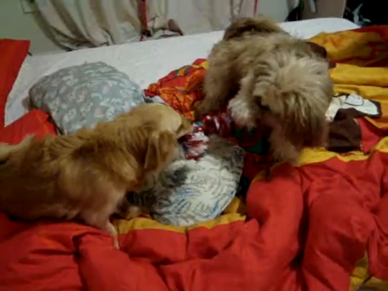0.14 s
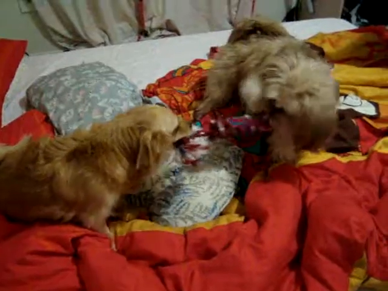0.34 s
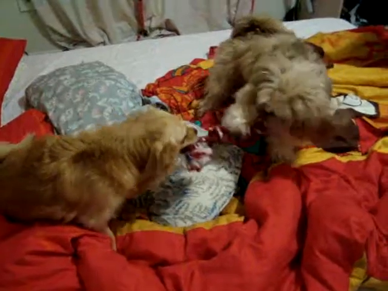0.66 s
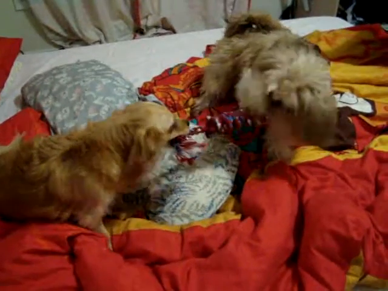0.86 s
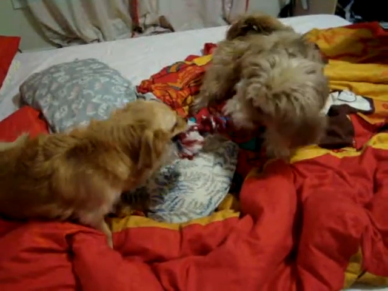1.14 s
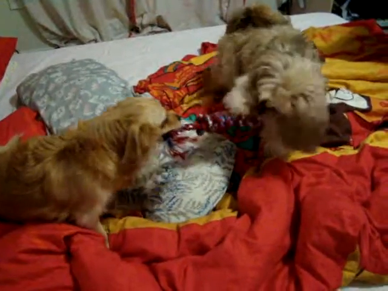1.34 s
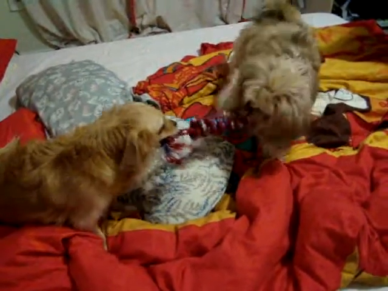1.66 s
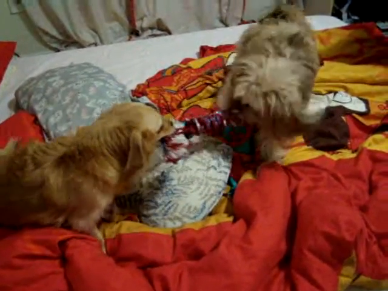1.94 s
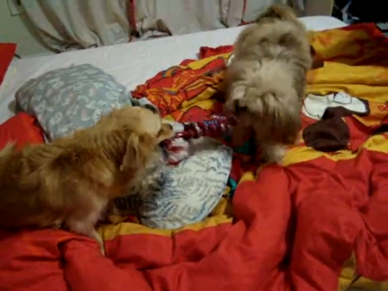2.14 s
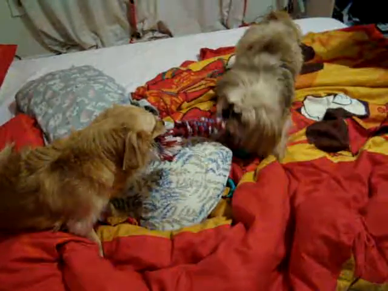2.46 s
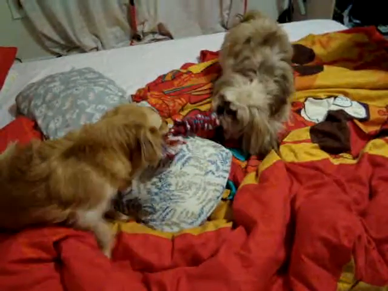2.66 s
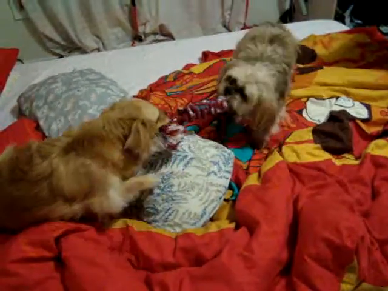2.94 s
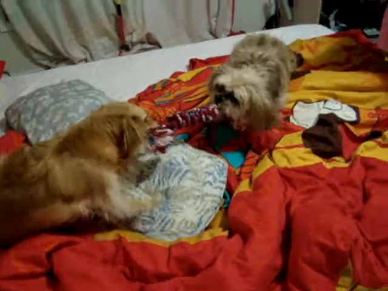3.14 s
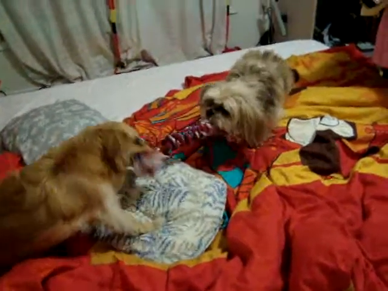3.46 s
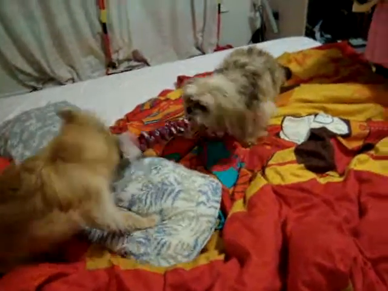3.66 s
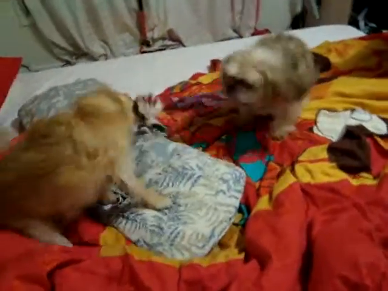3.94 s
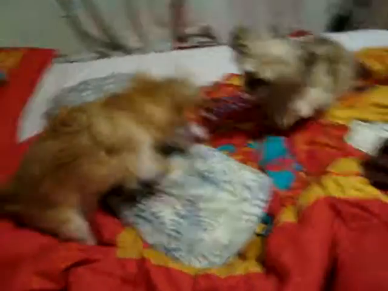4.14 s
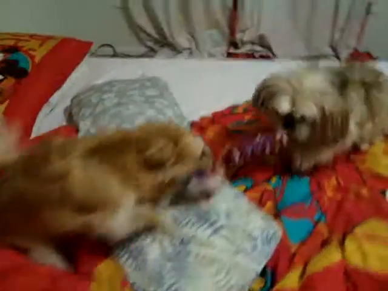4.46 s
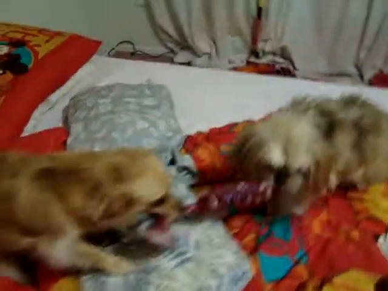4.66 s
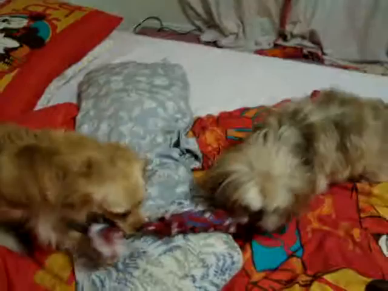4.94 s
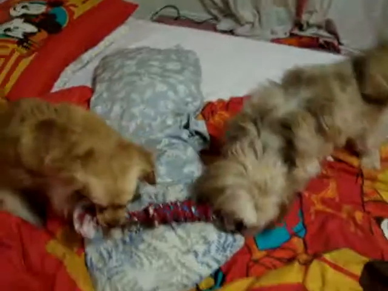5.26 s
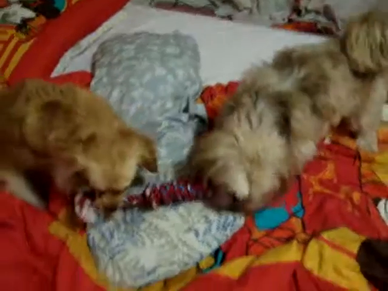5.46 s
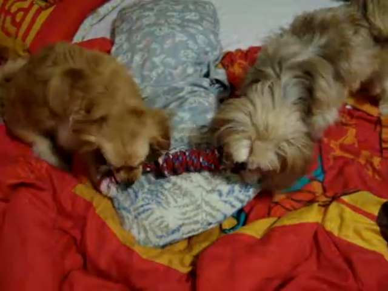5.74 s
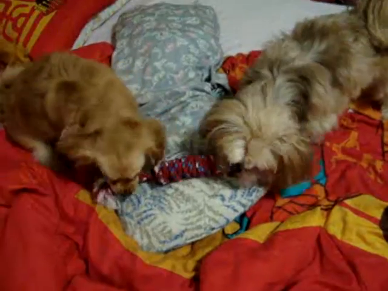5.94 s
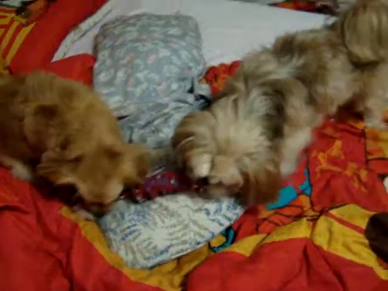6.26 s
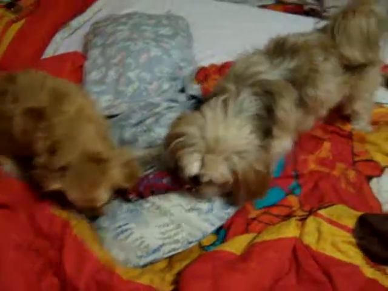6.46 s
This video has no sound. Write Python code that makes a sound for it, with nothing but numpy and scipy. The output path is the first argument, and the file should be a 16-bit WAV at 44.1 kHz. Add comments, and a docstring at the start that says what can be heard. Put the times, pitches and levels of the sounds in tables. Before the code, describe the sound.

Close, mono sound of small dogs play-growling indoors. Quiet gravelly bursts with gaps lead to rapid clipped growls, then longer rough snarls that shudder and snap, many ending in a wet nasal snort. A few tiny bright scrapes of teeth or claws join in. The end fades to low grunts and a faint nose whistle, over constant soft room hum and a short room echo.

```python
"""Tug-of-war on the bed

Two small dogs, close to the microphone, tug at a rope toy on a bed and growl in quick strings of short growls.
Slack vocal folds flap unevenly into chest, throat and muzzle; many growls end in a snort through the nose.
Single slaps of the folds, scrapes of teeth and claws on toy and bedding, and a faint nose whistle join in.
A small bedroom answers over its steady hum."""
import sys
import numpy as np
from scipy import signal
from scipy.fft import rfft, irfft, next_fast_len
from scipy.io import wavfile
from scipy.ndimage import uniform_filter1d, map_coordinates

SR = 44100
rng = np.random.default_rng(int(sys.argv[2]) if len(sys.argv) > 2 else 0)


def output_pcm(signal):
    """Save a mono or channel-first signal as 16-bit PCM at the path in sys.argv[1].

    Samples are clipped to [-1, 1] before scaling.
    """
    pcm = np.clip(np.atleast_2d(signal).T, -1, 1) * 32767
    wavfile.write(sys.argv[1], SR, np.round(pcm).astype(np.int16))


N = 290619  # samples


def amp(db):
    """Decibels to gain."""
    return 10 ** (np.asarray(db) / 20)


def unit(x):
    """Scale to rms 1."""
    return x / np.sqrt(np.mean(x ** 2) + 1e-20)


def along(points, hz):
    """(Hz, value) points read on a log frequency axis."""
    f, v = np.transpose(points)
    return np.interp(np.log(hz + 1), np.log(f + 1), v)


def filtered(x, response):
    """x times a complex response of frequency."""
    m = next_fast_len(len(x) + 4096)
    hz = np.fft.rfftfreq(m, 1 / SR)
    return irfft(rfft(x, m) * response(hz), m)[:len(x)]


def resonate(x, modes, low_hz):
    """x through (Hz, width Hz, dB) resonances that radiate little below low_hz."""
    def body(f):
        return sum(amp(db) * 1j * f * w / (c * c - f * f + 1j * f * w) for c, w, db in modes)

    def radiation(f):
        return -f * f / (low_hz ** 2 - f * f + 1j * np.sqrt(2) * f * low_hz)

    return filtered(x, lambda f: body(f) * radiation(f))


def muffle(x, edge_hz, order=2):
    """A causal low-pass."""
    return signal.sosfilt(signal.butter(order, min(edge_hz, SR / 3), fs=SR, output="sos"), x)


def steady(x, seconds):
    """Hold the rms near 1 over stretches of the given length."""
    x = unit(x)
    power = uniform_filter1d(x * x, max(int(seconds * SR), 2))
    return x / np.sqrt(np.abs(power) + 0.037)  # the floor keeps pauses from being blown up


def add(track, s, x):
    """Mix x into the track from time s."""
    start = max(round(s * SR), 0)
    track[start:start + len(x)] += x[:max(len(track) - start, 0)]


def wobble(n, rate):
    """A smooth random curve, rate knots a second."""
    knots = rng.standard_normal(int(n * rate / SR) + 4)
    return map_coordinates(knots, [np.arange(n) * rate / SR])


def blend(a, b, share):
    """Two unrelated sounds mixed by power; share is that of b."""
    share = np.clip(share, 0, 1)
    return np.sqrt(1 - share) * unit(a) + np.sqrt(share) * unit(b)


# Steady spectrum of the room at the microphone. Each row: frequency in Hz, relative density in dB per Hz.
HUM_SPECTRUM = [(12, -58), (20, -29), (144, -8.5), (173, -11.5), (213, 2.5), (291, 3), (687, -5.5),
                (868, -2), (1010, -6.5), (1350, -9), (1500, -10), (1990, -13), (3100, -15), (4830, -17),
                (10000, -22.5), (13000, -91), (22000, -120)]


def hum():
    """The steady background of the room: noise shaped to a fixed spectrum."""
    noise = rng.standard_normal(N)
    return amp(-48.0) * unit(filtered(noise, lambda hz: amp(along(HUM_SPECTRUM, hz))))


def flaps(n, rate, jitter, scatter_db):
    """Fold closures at uneven intervals and of uneven strength."""
    gap, size = rng.standard_normal((128, 2)).T
    gaps = np.exp(jitter * gap) / rate
    at = ((np.cumsum(gaps) - gaps[0] + 0.001977) * SR).astype(int)
    inside = at < n
    return np.bincount(at[inside], amp(scatter_db * size[inside]), n)


def fold_tone(n, hz):
    """The low hum of the folds when they swing almost evenly."""
    phase = 2 * np.pi * np.cumsum(hz * (1 + 0.048 * wobble(n, rate=41.8))) / SR
    return unit(np.sin(phase) + amp(-8.5) * np.sin(2 * phase))


def scatter(x, echo_db, fall):
    """Sound leaving the lowered head also bounces off the toy, the other dog and the bed."""
    t = np.arange(SR // 20) / SR
    paths = rng.standard_normal(len(t)) * np.exp(-t / fall) * (t > .0015)
    echoes = signal.fftconvolve(x, paths / np.linalg.norm(paths))[:len(x)]
    return x + amp(echo_db) * echoes


def airway(x, modes, low_hz, shift, echo_db, fall):
    """The jaw works on the toy, so resonances and near echoes drift between a lower and a higher place."""
    jaw = np.pi / 4 * (1 + np.tanh(3.8 * wobble(len(x), rate=30.65)))
    total = 0
    for side, share in [(-0.6, np.cos(jaw)), (0.7, np.sin(jaw))]:
        moved = [(hz * np.exp(side * shift), w, db) for hz, w, db in modes]
        total = total + scatter(resonate(x * share, moved, low_hz), echo_db, fall)
    return total


def slap():
    """The folds shut sharply and crack through the whole airway; peak 1."""
    stretch = np.exp(0.051 * rng.standard_normal())
    modes = [(830 * stretch, 150, 0), (1300 * stretch, 350, -8),
             (2100 * stretch, 400, -13), (3000 * stretch, 900, -20)]
    ring = muffle(resonate(signal.unit_impulse(2048), modes, low_hz=255), edge_hz=2160, order=6)
    ring = scatter(ring, echo_db=6.5, fall=0.003)
    return ring / np.abs(ring).max()


# Resonances of the chest. Each row: centre in Hz, width in Hz, gain in dB before radiation.
CHEST_MODES = [(139, 39, -9), (191, 54, 3), (275, 72, 5), (338, 17, 1)]
CLEAN_AT_0_DB, CLEAN_GROWS = 1.95, 1.5  # the stronger the chest, the more evenly the folds swing
FALL_OCTAVES, FALL_S = 0.22, 0.092  # the fold tone sinks around the end of a growl


def chest_voice(pulses, t, length, rate, chest_db, tension):
    """Flaps ring the chest; tense folds add an even, sinking tone."""
    rumble = muffle(resonate(pulses, CHEST_MODES, low_hz=134), edge_hz=343, order=4)
    pitch = rate * 2 ** (-FALL_OCTAVES * np.clip((t - length) / FALL_S + .5, 0, 1))
    clean = CLEAN_AT_0_DB * amp(2 * CLEAN_GROWS * chest_db) * tension
    return blend(steady(rumble, seconds=.035), fold_tone(len(t), pitch), clean)


# Upper throat resonances. Each row: centre in Hz before the jaw moves it, width in Hz, gain in dB before radiation.
PHARYNX_MODES = [(587, 71, -20), (1128, 200, -16), (1310, 165, -8)]
THROAT_WIDTH_HZ, WIDTH_LOSS_HZ = 257, 157  # the throat resonance sharpens with effort


def throat_voice(pulses, puffs, air, effort, throat_hz):
    """Flaps and turbulent puffs ring the throat."""
    width = max(THROAT_WIDTH_HZ - WIDTH_LOSS_HZ * effort.mean(), 20)
    modes = [(throat_hz, width, 0)] + PHARYNX_MODES
    throat = airway(blend(pulses, puffs, air * 0.56), modes, low_hz=550, shift=0.028, echo_db=0, fall=0.016)
    return steady(muffle(throat, edge_hz=1220, order=4), seconds=0.028)


# Muzzle resonances. Each row: centre in Hz before the jaw moves it, width in Hz, gain in dB before radiation.
MUZZLE_MODES = [(2155, 170, 12), (2670, 520, 1), (3920, 980, -1.5)]
LIP_WIDTH_HZ, LIP_DB = 520, 2.5  # the mouth's front resonance, gain on the same scale


def muzzle_voice(pulses, puffs, alternation, air, lip_hz):
    """Flaps and turbulent puffs ring the muzzle and lips."""
    source = alternation * blend(pulses, puffs, 0.34 + air * 0.68)
    modes = MUZZLE_MODES + [(lip_hz, LIP_WIDTH_HZ, LIP_DB)]
    muzzle = airway(source, modes, low_hz=1850, shift=0.053, echo_db=-4.5, fall=0.0038)
    return steady(muffle(muzzle, edge_hz=3300 + 0.2 * lip_hz, order=10), seconds=0.077)


# Resonances of air hissing at the lips. Each row: centre in Hz, width in Hz, gain in dB before radiation.
LIP_HISS_MODES = [(5300, 2400, 0.17), (7660, 2500, -1.2)]


def lip_hiss(puffs, alternation):
    """Turbulent puffs hiss at the lips."""
    return unit(resonate(alternation * puffs, LIP_HISS_MODES, low_hz=4430))


CRACK_SCATTER_DB = 22.5  # greatest rise or fall of single ticks


def crack(pulses):
    """The dry tick of each fold closure, of widely varying strength."""
    strength = amp(CRACK_SCATTER_DB * np.tanh(wobble(len(pulses), rate=310)))
    ticks = resonate(pulses * strength, [(1400, 2600, -2.5), (4430, 760, 0.5)], low_hz=500)
    return muffle(unit(ticks), edge_hz=4100)


SHUDDER_HZ, SHUDDER_DB = 24.4, 6  # mean rate, full swing to either side
SHUDDER_FROM_DB, SHUDDER_FULL_DB = -26, -22  # growl levels between which it sets in


def shudder(n, level_db):
    """In a hard growl the loose lips and palate shudder almost evenly; the swing in dB."""
    depth_db = np.interp(level_db, [SHUDDER_FROM_DB, SHUDDER_FULL_DB], [0, SHUDDER_DB])
    rate = SHUDDER_HZ + 0.28 * wobble(n, rate=20)
    return depth_db * np.sin(2 * np.pi * np.cumsum(rate) / SR)


RELEASE_S = .016  # the push of air dies away
QUIET_DB, HARD_DB = -36, -22  # push at no effort and at full effort
SLACK_RATE, TENSE_RATE = 83, 350  # flaps per s
AIR_SLACK, AIR_TENSE = 0.14, 0.31  # turbulent air of slack and of tense folds, scaled for throat and muzzle
ALTERNATE_DB = -6  # at full effort every second flap reaches the muzzle weaker
HISS_DB, HISS_SHUDDER = -13, 0.6  # under the muzzle; share of the muzzle's shudder in dB
CRACK_DB = -15  # under the muzzle, at full tension


def growl(length, attack, level_db, swell_db, chest_db, muzzle_db, rate, throat_hz, lip_hz):
    """One growl: each flap rings the airway and lets a puff of turbulent air through."""
    t = np.arange(0, length + .1, 1 / SR)
    n = len(t)
    push_db = level_db + swell_db * (np.minimum(t / length, 1) - .5)
    release = np.exp(-np.maximum(t - length, 0) / RELEASE_S)
    envelope = amp(push_db) * np.minimum(t / attack, 1) * release
    effort = np.clip((push_db - QUIET_DB) / (HARD_DB - QUIET_DB), 0, 1)
    tension = np.interp(rate, [SLACK_RATE, TENSE_RATE], [0, 1])
    air = AIR_SLACK + tension * (AIR_TENSE - AIR_SLACK)

    pulses = flaps(n, rate, jitter=.4, scatter_db=2.5)
    puff_shape = signal.lfilter([1], [1, -np.exp(-1 / (.004 * SR))], pulses)  # each puff fades in 4 ms
    puffs = puff_shape * rng.standard_normal(n)
    alternation = amp(ALTERNATE_DB * effort * (np.cumsum(pulses > 0) % 2))

    chest = chest_voice(pulses, t, length, rate, chest_db, tension)
    throat = throat_voice(pulses, puffs, air, effort, throat_hz)
    muzzle = muzzle_voice(pulses, puffs, alternation, air, lip_hz)
    hiss = lip_hiss(puffs, alternation)
    ticks = tension * amp(CRACK_DB) * crack(pulses)

    shudder_db = shudder(n, level_db)
    mouth = amp(shudder_db) * (muzzle + ticks) + amp(HISS_DB + HISS_SHUDDER * shudder_db) * hiss
    voice = amp(0.1 * shudder_db) * throat + amp(chest_db) * chest + amp(muzzle_db) * mouth
    return envelope * voice


# Growls of both dogs, close to the microphone. Each row: start in seconds, length in seconds,
# attack in seconds, level in dB, swell from start to end in dB, chest over throat in dB,
# muzzle over throat in dB, flaps per second before jitter, throat resonance in Hz and lip
# resonance in Hz, both before the jaw moves them.
GROWL_EVENTS = [ (0.0, 0.097, .004, -42.5, -13.5, -18, -7, 103, 630, 3580),
                (0.321, 0.19, .004, -38.5, 3, -15.5, -11.5, 100.5, 734, 3280),
                (0.734, 0.11, .004, -42.5, -5.5, -14, -18, 84, 710, 3780),
                (1.052, 0.21, .004, -43, 2.5, -12, -8.5, 90, 740, 3570),
                (1.269, 0.058, .008, -35.5, -0.5, -12, -12.5, 112, 780, 3450),
                (1.545, .11, .003, -37.5, -1, -11, -6, 104, 766, 3360),
                (1.865, 0.087, .003, -34, -2, -14.5, -9.5, 100, 790, 2500),
                (2.115, 0.1, .025, -35.5, -17, -10.5, -8.5, 138, 865, 3100),
                (2.345, 0.02, .006, -35, 5, -10, -13, 132, 850, 2500),
                (2.39, 0.076, .006, -26.5, -1, -8.5, -10.5, 188, 860, 2500),
                (2.471, 0.064, .01, -35.5, 5.5, -7, -5.5, 155, 845, 2960),
                (2.695, 0.046, .01, -32.5, -7, -8, -5.5, 168, 850, 2750),
                (2.879, 0.018, .01, -30.5, 3.5, -9, -10.5, 171, 850, 2500),
                (2.912, 0.027, .004, -25.5, 4, -14, -11.5, 175, 893, 2750),
                (2.957, 0.03, .008, -32.5, 1.5, -7, -8.5, 145, 890, 2940),
                (3.005, 0.036, .005, -25.5, 2, -14, -10.5, 190, 900, 2840),
                (3.238, 0.0087, .004, -31.5, -9, -10.5, -7, 170, 860, 2960),
                (3.267, .32, .008, -26, -1.5, -13, -11.5, 139.6, 847, 2650),
                (3.952, 0.14, .012, -24.5, 9.5, -15, -6.5, 213, 838, 2690),
                (4.268, .014, .008, -24, -2, -13, -11, 200, 780, 3170),
                (4.297, 0.32, .005, -21.5, 5.5, -14.5, -10, 208, 775, 3380),
                (4.774, 0.038, .025, -30.5, 1, -3.5, -4.5, 180, 890, 3930),
                (4.959, 0.05, .022, -30, -2, -4.5, -3, 166, 915, 3850),
                (5.142, 0.17, .025, -30, -1, -4.5, -11.5, 182, 860, 3370),
                (5.492, 0.049, .008, -36.5, 2.5, -2, -6, 202, 900, 2820),
                (5.709, 0.076, .03, -37.5, -4, -2, -4, 167, 875, 3940),
                (5.953, 0.046, .03, -38, -6.5, -1, -5.5, 176, 960, 3410),
                (6.149, 0.12, .03, -40.5, -12.5, -0.5, -4, 180, 890, 3380),
                (6.542, 0.054, .005, -41, 16, -1, -7.5, 170, 886, 3420), ]
OPENING_SLAP_DB, ABRUPT_S = 2, 0.0078  # first closure over the growl's level; slower attacks lose it


def growls():
    """The whole string of growls; an abrupt one opens with a slap of the folds."""
    track = np.zeros(N)
    for start, length, attack, level_db, *voice in GROWL_EVENTS:
        add(track, start, growl(length, attack, level_db, *voice))
        abruptness = np.exp(-(attack / ABRUPT_S) ** 2)
        add(track, start + attack / 2, amp(level_db + OPENING_SLAP_DB) * abruptness * slap())
    return track


# How long the small bedroom rings. Each row: frequency in Hz, time to fall by 60 dB in seconds.
ROOM_DECAY = [(150, 0.46), (800, 0.36), (2500, 0.32), (9000, 0.085)]


def bedroom(x):
    """The walls answer after 5 ms, always differently as the dogs move; bedding soon swallows the sound."""
    wet, step = np.zeros(N), SR // 8
    padded = np.pad(x, (step, step))
    for start in range(0, N, step):
        hz, t, z = signal.stft(rng.standard_normal(SR // 2), SR, nperseg=256)
        decay = amp(-60 * t / along(ROOM_DECAY, hz)[:, None])
        tail = signal.istft(z * decay, SR, nperseg=256)[1]
        piece = padded[start:start + 2 * step]
        faded = piece * np.hanning(2 * step)[:len(piece)]  # overlapping pieces crossfade
        echo = signal.fftconvolve(faded, tail / np.linalg.norm(tail))
        add(wet, (start - step) / SR + .005, echo[step:] if start == 0 else echo)
    return wet


# Resonances of the nose. Each row: centre in Hz, width in Hz, gain in dB before radiation.
NOSE_MODES = [(1980, 270, -6), (2710, 960, -15), (3780, 650, -29), (5700, 890, -14), (8800, 1100, -43)]
# Snorts, close to the microphone. Each row: peak time in seconds, level in dB, rise in seconds, nostril resonance in Hz.
SNORT_EVENTS = [(.078, -51.5, .012, 3520), (.522, -37, 0.007, 2020), (0.842, -45, 0.033, 2500),
                (1.346, -44, .017, 1930), (1.66, -38, 0.01, 1980), (1.951, -29, 0.027, 2170),
                (2.186, -28, 0.016, 2130), (2.746, -35, 0.0084, 2160), (3.036, -40, 0.011, 4500),
                (3.073, -36.5, 0.013, 2230), (3.968, -29, 0.028, 1970), (4.09, -22.5, 0.02, 2440),
                (4.612, -26.5, 0.0053, 3320), (5.329, -28.5, .014, 3000), (5.778, -36, 0.014, 2970),
                (6.205, -35.5, 0.0058, 3460)]
SNORT_FALL_S, FLUTTER_DB = 0.019, 2.5


def snorts():
    """Air forced through the nose, chopped by the fluttering soft palate."""
    track, t = np.zeros(N), np.arange(-SR // 8, SR // 8) / SR
    for s, db, rise, hz in SNORT_EVENTS:
        flutter = amp(FLUTTER_DB * np.tanh(wobble(len(t), rate=290)))
        breath = flutter * rng.standard_normal(len(t))
        hiss = resonate(breath, NOSE_MODES + [(hz, 650, 0)], low_hz=1350)
        hiss = unit(muffle(hiss, edge_hz=3770))
        envelope = np.exp(-np.where(t < 0, (t / rise) ** 2, t / SNORT_FALL_S))
        add(track, s + t[0], amp(db) * hiss * envelope)
    return track


# Single slaps of the folds, from hard to faint, close to the microphone. Each row: start in seconds, peak in dB.
SLAP_EVENTS = [(0.454, -28.5), (1.053, -38), (1.305, -35), (1.522, -26.5), (1.548, -26.5), (1.894, -29),
               (2.39, -21), (2.919, -21), (2.939, -21), (3.346, -14), (3.39, -14), (4.042, -12.5),
               (4.539, -10), (4.752, -32), (5.189, -17), (6.169, -32), (6.548, -28.5)]


def slaps():
    """Now and then a single closure of the folds, hard or faint, is added to the growls."""
    track = np.zeros(N)
    for s, db in SLAP_EVENTS:
        add(track, s, amp(db) * slap())
    return track


# Teeth and claws on toy and bedding. Each row: start in seconds, level in dB, fall in seconds, centre in Hz.
SCRAPE_EVENTS = [(.791, -36, 0.0057, 4060), (0.921, -40, 0.0058, 3200), (4.172, -33, 0.0089, 5450),
                 (4.195, -37, 0.015, 5850), (5.539, -40.5, 0.021, 5270)]


def scrapes():
    """Short bright scratches that start at once and die away."""
    track, t = np.zeros(N), np.arange(SR // 8) / SR
    for s, db, fall, hz in SCRAPE_EVENTS:
        grit = unit(resonate(rng.standard_normal(len(t)), [(hz, 1600, 0)], low_hz=2500))
        add(track, s, amp(db) * grit * np.exp(-t / fall))
    return track


# Path of a thin nose whistle. Each row: time in seconds, pitch in Hz before it wavers, peak level in dB.
WHISTLE_PATH = [(6.298, 1098, -56), (6.345, 1155, -46.5), (6.41, 1177, -50), (6.45, 1150, -58)]


def whistle():
    """A narrowed nostril sings faintly: one wavering sine."""
    s, hz, db = np.transpose(WHISTLE_PATH)
    t = np.arange(N) / SR
    waver = 1 + .008 * wobble(N, rate=40)
    phase = 2 * np.pi * np.cumsum(np.interp(t, s, hz) * waver) / SR
    return amp(np.interp(t, s, db, -120, -120)) * np.sin(phase)


def scene():
    """Both dogs close by, in the room."""
    dogs = growls() + slaps() + snorts() + scrapes() + whistle()
    return (dogs + amp(-12) * bedroom(dogs) + hum())[None]


TOP_HZ = 10150  # band limit


def record(dry):
    """The microphone sheds the deep bass and keeps nothing above its band limit."""
    thin = signal.sosfilt(signal.butter(1, 70, "high", fs=SR, output="sos"), dry)
    return np.array([filtered(channel, lambda hz: hz < TOP_HZ) for channel in thin])


dry = scene()
out = record(dry)
output_pcm(out)
```